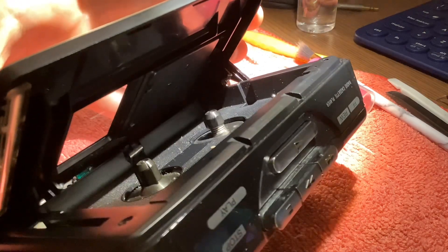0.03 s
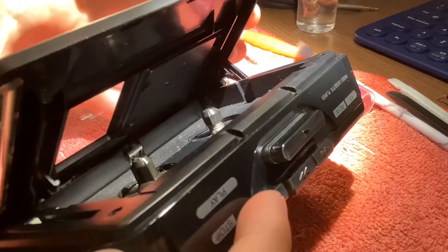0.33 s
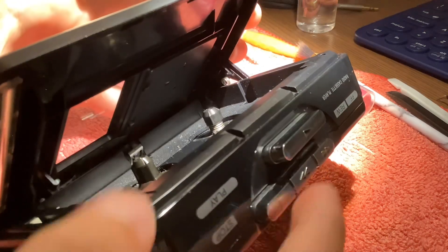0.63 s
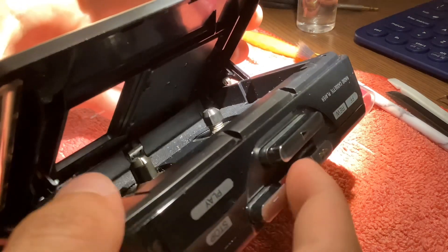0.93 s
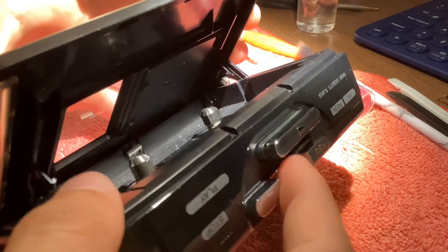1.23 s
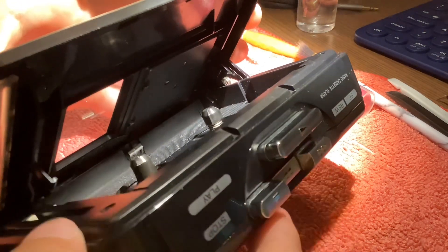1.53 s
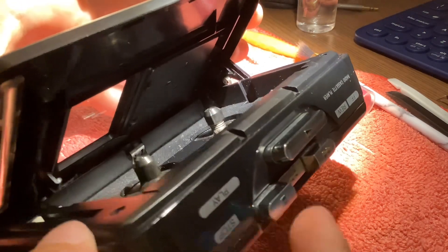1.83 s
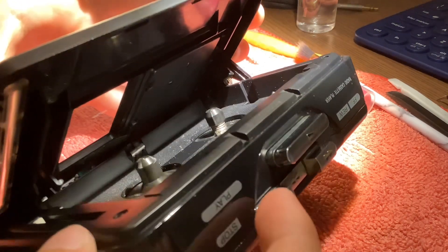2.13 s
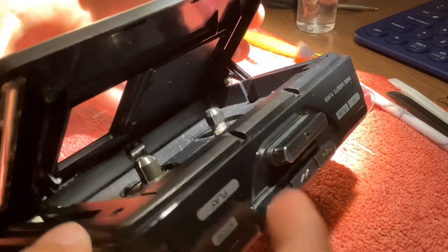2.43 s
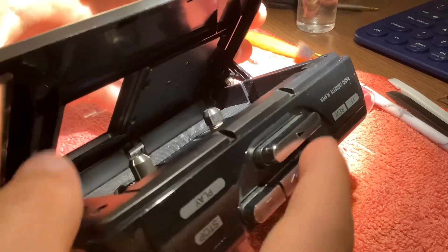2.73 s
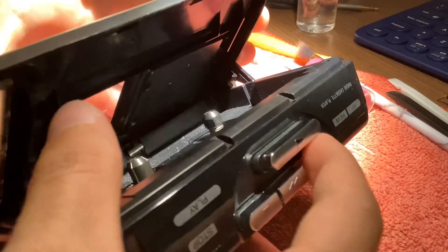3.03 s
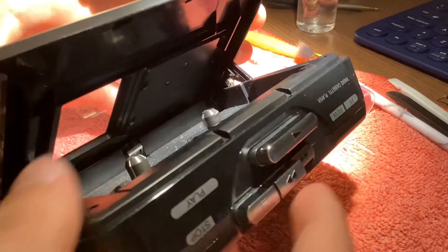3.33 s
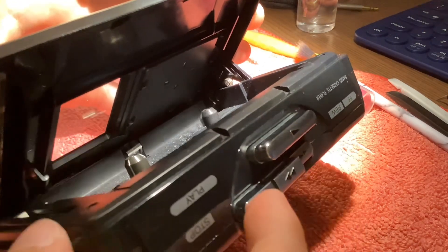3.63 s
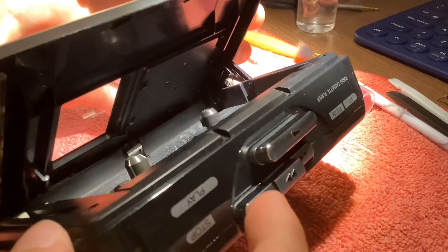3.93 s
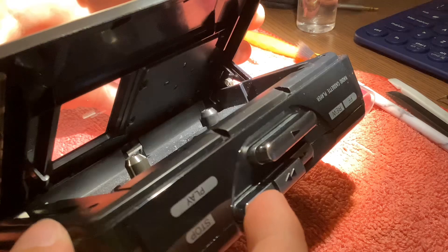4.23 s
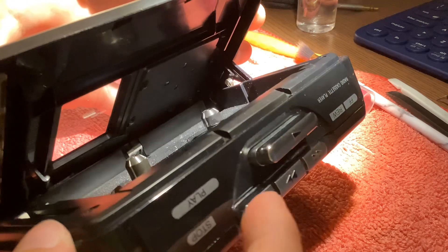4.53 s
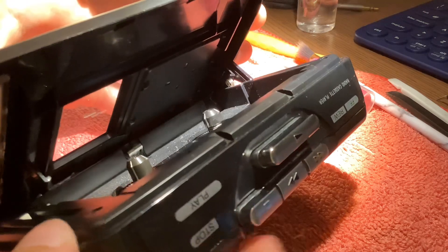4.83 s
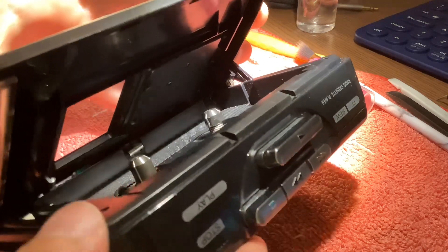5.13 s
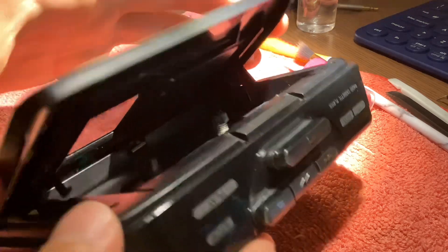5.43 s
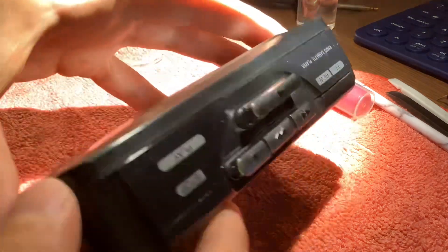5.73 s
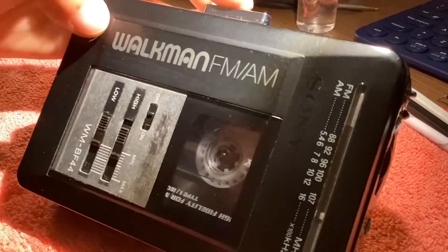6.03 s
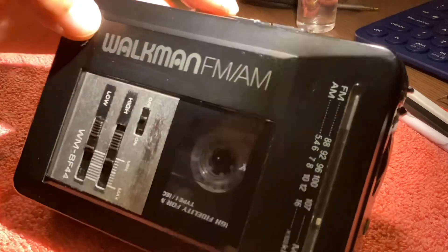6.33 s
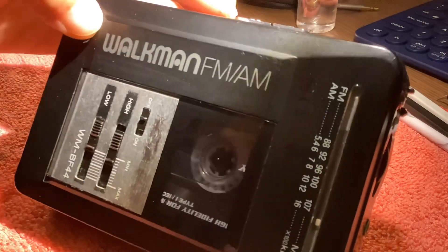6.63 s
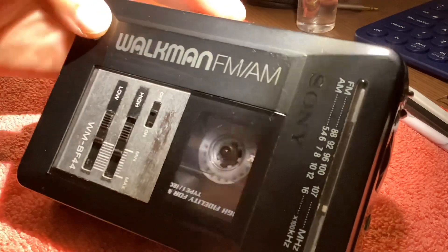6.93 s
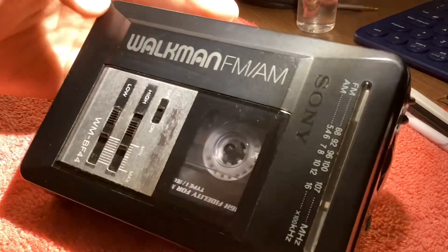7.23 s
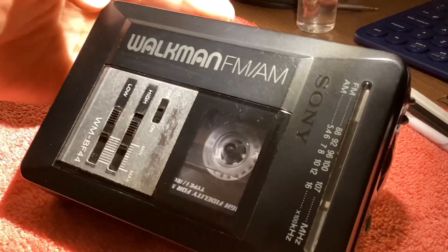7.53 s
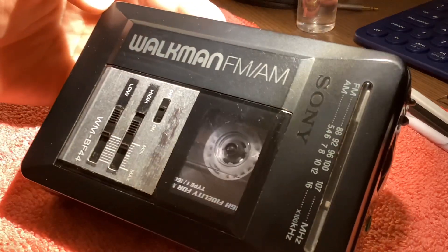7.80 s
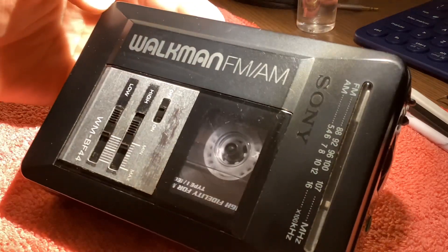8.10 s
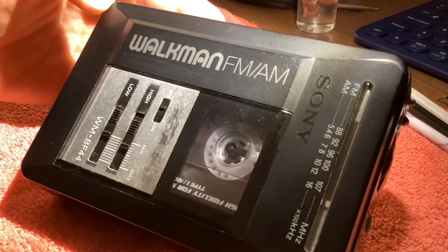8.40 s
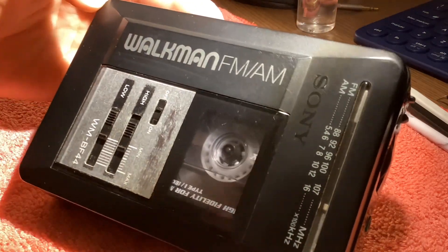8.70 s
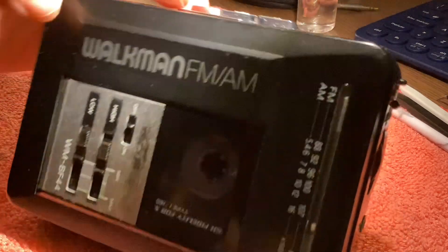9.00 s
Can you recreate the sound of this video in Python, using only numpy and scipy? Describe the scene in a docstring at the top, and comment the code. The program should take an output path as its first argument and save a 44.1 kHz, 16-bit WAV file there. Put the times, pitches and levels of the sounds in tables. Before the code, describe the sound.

Close up in a quiet small room, the keys of a portable cassette player latch and spring back with sharp clicks and soft thuds. Its motor ticks faintly in play, then whirrs in fast wind until another click stops it. Fingers tap and slide on the plastic, the lid is shut, and the case clacks and creaks lightly before a faint motor hum continues through it.

```python
"""Working a portable cassette player

Close up, over a towel on a desk in a small room, keys latch and spring back and the player thuds softly.
Its motor ticks in play and whirrs in fast wind. Fingers tap and slide on the plastic, the lid is shut,
the player is laid down, and play is pressed again, so that the motor hums through the closed case."""
import sys
import numpy as np
from scipy import signal
from scipy.fft import rfft, irfft, next_fast_len
from scipy.io import wavfile
from scipy.ndimage import uniform_filter1d, map_coordinates

SR = 44100
rng = np.random.default_rng(int(sys.argv[2]) if len(sys.argv) > 2 else 0)


def wav_record(signal):
    """Record a signal, one row per channel, as 16-bit PCM in the file named by sys.argv[1]."""
    frames = np.transpose(np.atleast_2d(signal))
    bounded = np.clip(frames, -1, 1)
    # unit amplitude maps onto the largest positive 16-bit level
    quanta = np.round(bounded * 32767).astype(np.int16)
    wavfile.write(sys.argv[1], SR, quanta)


N = 399546
TIME_S = np.arange(N) / SR

# Keys latching or springing back. Knock, edge and snap are parts of a hit, explained in impact().
# start_s, level_db, knock_db, edge_db, snap_db, fade_s
KEY_HITS = [(0.311, 6.5, -2, -0.5, -5.5, 0.0087), (0.315, 1, -7.5, -1, -7, 0.019),
            (1.07, -6, -18, 0, -12, 0.012), (2.273, 3, -19, 0, -6.5, 0.02),
            (2.971, -4, -30, -0.5, 7.5, 0.037), (2.99, -1.5, -22.5, -0.5, 3.5, .012),
            (4.389, -1.5, -19.5, -2.5, 2, 0.017), (4.392, -0.5, -32.5, -3, 3, 0.022)]
# The tone of a key hit, or how strong it is at each pitch: pitch_hz, level_db
KEY_TONE = [(300, -37), (600, -11), (1000, -1.5), (1500, -0.5), (2100, -2.5), (2900, -4), (3700, -3),
            (5400, -1.5), (7500, -17), (10400, -33), (17000, -79)]

def keys():
    """Springs slam the key mechanism against its stops."""
    out = np.zeros(N)
    for start_s, level_db, knock_db, edge_db, snap_db, fade_s in KEY_HITS:
        hit = impact(KEY_TONE, knock_db, edge_db, snap_db, fade_s,
                     rise_s=0.0033, ring_db=7.5, chatter_db=2, panel_db=-8)
        add(out, start_s, amp(level_db) * in_room(hit, echo_db=-14.5))
    return out


# The notes at which the plastic shell and the steel levers ring: pitch_hz, width_hz, level_db
SHELL_NOTES = [(1060, 80, -1), (1180, 37, -3.5), (1500, 210, 2), (2116, 79, 1), (2380, 35, -4.5),
               (3540, 120, -4), (3730, 120, -2), (5490, 140, -5.5), (6050, 100, -7)]
LEVER_NOTES = [(9250, 83, -3.5), (9600, 30, -5.5), (11030, 56, 0), (10500, 93, 0), (11300, 110, -0.5),
               (10400, 110, 0), (12600, 100, -9)]
# The tones of the snapping levers and the knocking inner frame: pitch_hz, level_db
SNAP_TONE = [(4120, -38), (7000, -12), (7800, -13), (8900, -5.5), (10900, -6), (12600, -10.5),
             (15600, -20.5), (16300, -23), (16500, -34)]
KNOCK_TONE = [(40, -29.5), (130, -2.5), (250, 1), (480, 4.5), (750, 4), (1300, -20), (4000, -71)]

def impact(tone, knock_db, edge_db, snap_db, fade_s, rise_s, ring_db, chatter_db, panel_db):
    """Parts collide and the shell rings. Frame knock, hard edge and lever snap are set against that."""
    t = np.arange(4096) / SR
    hz = np.fft.rfftfreq(len(t), 1 / SR)
    swell = amp(np.minimum(25 * (t / rise_s - 1), -60 * (t - rise_s) / fade_s))  # 60 dB down in fade_s
    chatter = amp(chatter_db * unit(uniform_filter1d(noise(len(t)), size=20)))
    force = swell * chatter * noise(len(t))
    # Each spot that is hit favours other notes of the shell and rings three small panels nearby.
    notes = [(pitch, width, db + rng.normal(0, 2.5)) for pitch, width, db in SHELL_NOTES]
    panel_hz, panel_width_hz = 2100, 170
    notes += [(panel_hz * np.exp(0.42 * shift), panel_width_hz, panel_db) for shift in noise(3)]
    shell = amp(along(tone, hz)) * np.hypot(1, amp(ring_db) * abs(resonances(notes, hz)))
    hard = (hz / 2630) ** 5  # only hard contact rings the shell above 2630 Hz
    steel = amp(along(SNAP_TONE, hz)) * np.hypot(1, amp(3) * abs(resonances(LEVER_NOTES, hz)))
    # The heavy frame also feels one firm push.
    push = force / np.linalg.norm(force) + 0.37 * (np.arange(len(t)) == round(rise_s * SR))
    knock = struck(push, amp(along(KNOCK_TONE, hz)))
    ring = struck(force, shell / np.hypot(1, hard))
    edge = struck(force, shell * hard / np.hypot(1, hard))
    snap = struck(force, steel)
    return amp(knock_db) * knock + ring + amp(edge_db) * edge + amp(snap_db) * snap


# The tone of the closed case: pitch_hz, level_db
CLOSED_TONE = [(290, -52), (500, -10.5), (903, 1), (1850, -11), (2420, -8), (3090, -10), (3510, -11.5),
               (3940, -13), (5990, -18.5), (6420, -32.5), (8000, -35), (10400, -49), (17600, -120)]

def clack(knock_db, edge_db):
    """One hit on the closed case sounds duller, because the lid muffles the levers."""
    hit = impact(CLOSED_TONE, knock_db, edge_db, snap_db=edge_db - 23.5,
                 fade_s=0.023, rise_s=0.00295, ring_db=1.5, chatter_db=10.0, panel_db=3)
    return in_room(hit, echo_db=-16)


# Bumps on the closed case: start_s, level_db, knock_db, edge_db
CASE_CLACKS = [(5.839, -26, -14, -5), (5.897, -38, -27.5, 3.5), (6.055, -26, -16, -14.5),
               (6.244, -23, -4, -3), (6.314, -16.5, -14, -11), (6.349, -10.5, -16, 1.5),
               (6.393, -22, -9.5, 6), (6.499, -17.5, -9.5, 3.5), (6.692, -17, -31.5, -6),
               (6.938, -17, -24, -5), (8.903, -28, -7, -12.5)]
# Creaks of the closed case: start_s, length_s, gap_s, level_db
CASE_CREAKS = [(6.18, .11, .02, -26), (6.32, .015, 0.009, -32.5), (6.438, .095, 0.041, -24),
               (6.811, .12, 0.041, -23), (6.972, .06, .042, -31.5)]

def closed_case():
    """The closed case clacks as it is laid down, and creaks in the hand's grip."""
    out = np.zeros(N)
    for start_s, level_db, knock_db, edge_db in CASE_CLACKS:
        add(out, start_s, amp(level_db) * clack(knock_db, edge_db))
    for start_s, level_db in slips(CASE_CREAKS):
        add(out, start_s, amp(level_db) * clack(knock_db=-13, edge_db=-7))
    return out


# The tone of a light tap: pitch_hz, level_db
TAP_TONE = [(350, -45.5), (600, -12.5), (1090, 5), (1870, -5.5), (2180, -8), (3250, -10.5), (3710, -13.5),
            (4650, -9.5), (5070, -19), (5530, -15.5), (8000, -23), (10400, -49), (17600, -120)]

def tap(edge_db, snap_db):
    """One light touch on the open player. The softer the contact, the more it knocks the frame."""
    knock_db = -24.5 - 0.55 * edge_db
    hit = impact(TAP_TONE, knock_db, edge_db, snap_db,
                 fade_s=0.025, rise_s=0.0022, ring_db=6.5, chatter_db=4.5, panel_db=4)
    return in_room(hit, echo_db=-15)


# Fingers tapping the open player: start_s, level_db, edge_db, snap_db
FINGER_TAPS = [(0.294, -18, -0.5, -9.5), (0.667, -33.5, -7, -21), (0.716, -36, 6, -17),
               (0.844, -27, -7, -33.5), (1.015, -31, 9, -6), (1.259, -31, 2, -9.5),
               (1.358, -27.5, -4.5, -26), (1.795, -26, -12, -28), (1.818, -16, -15.5, -38),
               (1.951, -28.5, -4, -25), (2.46, -32.5, -13.5, -1.5), (2.519, -21.5, -2.5, -2.5),
               (2.622, -28.5, -11, -10), (2.902, -32, -7, -15), (2.944, -20.5, -.5, 4.5),
               (2.954, -15.5, -9.5, 0), (3.064, -24, -15, -8), (3.18, -31.5, 4.5, 4.5),
               (4.646, -30, -4, -3), (4.769, -43, -3, 12.5), (4.794, -21.5, -12, -8.5),
               (4.89, -31, -30.5, -5), (5.046, -37, -4, -3), (5.068, -21.5, 5.5, 7),
               (5.138, -27.5, -28, -25), (5.173, -20.5, 1, -9), (5.176, -17.5, -7, -5),
               (5.263, -19, -2.5, -4), (5.321, -25.5, -8, -16), (5.501, -24.5, -3, 1), (5.51, -18, -9, -27),
               (5.719, -23, -8.5, -10), (5.757, -21, -27, -33)]
# Creaks of the open frame: start_s, length_s, gap_s, level_db
FRAME_CREAKS = [(0.562, .06, .045, -39.5), (0.893, .08, .034, -29.5), (4.962, .04, .033, -39),
                (5.528, .07, 0.031, -24)]

def finger_taps():
    """The loose keys and the lid tick under the fingers, and the open frame creaks softly."""
    out = np.zeros(N)
    for start_s, level_db, edge_db, snap_db in FINGER_TAPS:
        add(out, start_s, amp(level_db) * tap(edge_db, snap_db))
    for start_s, level_db in slips(FRAME_CREAKS):
        add(out, start_s, amp(level_db) * tap(edge_db=-9, snap_db=-36))
    return out


def slips(creaks):
    """Strained plastic sticks and slips unevenly. Gives start_s and level_db for each slip."""
    for start_s, length_s, gap_s, level_db in creaks:
        count = int(length_s / gap_s) + 1
        late, loud = noise((count, 2)).T
        gaps = gap_s * np.exp(0.13 * late)
        yield from zip(start_s + np.cumsum(gaps) - gaps, level_db + 2.5 * loud)


# The whole player bouncing: start_s, swing_db, desk_db
BOUNCES = [(0.3154, -21, -31.5), (1.076, -45, -35), (2.274, -59.5, -48.5), (2.992, -49, -45),
           (3.27, -56, -60), (4.4, -55, -36.5), (4.86, -58.5, -66), (5.14, -65, -63), (5.3, -62, -63.5),
           (6.318, -61, -46), (6.507, -52, -42), (8.906, -61, -47)]
# The tone of the desk's rumble: pitch_hz, level_db
DESK_TONE = [(25, -31.5), (60, -8), (120, 5.5), (200, -14.5), (350, -22.5), (800, -73)]

def thuds():
    """The player's weight swings a few times on the towel, and the desk rumbles after it."""
    out = np.zeros(N)
    t = np.arange(SR // 2) / SR
    swing_hz, swing_fade_s, desk_fade_s = 77, 0.085, 0.1
    for start_s, swing_db, desk_db in BOUNCES:
        swing = np.cos(2 * np.pi * swing_hz * t) * amp(-60 * t / swing_fade_s) * (1 - np.exp(-t / 0.001))
        desk = with_tone(noise(len(t)), DESK_TONE) * amp(-60 * t / desk_fade_s) * (1 - np.exp(-t / 0.034))
        add(out, start_s, amp(swing_db) * swing + amp(desk_db) * desk)
    return out


# When fast wind runs: on_s, off_s
WIND_TIMES = [(2.98, 4.39)]
# Motor speed, given as the pulsing of its pull (three pulses a turn): time_s, pulse_hz
WIND_SPEED = [(3, 92.8), (3.4, 96.4), (4.4, 97.1)]
# The tone of the belt and gears in fast wind: pitch_hz, level_db
WIND_TONE = [(150, -48), (250, -19.5), (373, -18), (474, -5.5), (544, -22.5), (772, -5.5), (1010, -6.5),
             (1100, 5.5), (1260, -12), (1390, -0.5), (1830, -14.5), (2240, -10.5), (2880, -27),
             (3700, -19.5), (5000, -40.5), (6500, -74), (11000, -120)]
# Metal rung by the brushes, the motor's sliding contacts: pitch_hz, width_hz, level_db
WIND_NOTES = [(5900, 310, -17), (6940, 410, -12), (9900, 1400, -5.5), (10960, 530, 0.5), (11700, 460, -5),
              (13300, 860, -14.5), (14690, 711, -17.5)]

def fast_wind():
    """The motor and gears whirr as they wind the tape."""
    whirr = mechanism(WIND_SPEED, WIND_TONE, WIND_NOTES, brush_db=2.5, tick_db=-11.5, sharpness=2.9)
    return amp(-57.5) * whirr * switched(WIND_TIMES)


# When the tape plays with the lid open: on_s, off_s
OPEN_TIMES = [(-1, 0.31), (1.07, 2.27)]
# Motor speed with the lid open: time_s, pulse_hz
OPEN_SPEED = [(0, 114.2), (2.3, 115.7)]
# The tone of the uncovered belt and gears: pitch_hz, level_db
OPEN_GEAR_TONE = [(120, -35.5), (200, -22.5), (400, -22), (465, -13.5), (550, -16.5), (900, -11),
                  (1040, -0.5), (1150, -0.5), (1270, -16), (1400, -4), (1820, -14), (2140, -3.5),
                  (2600, -27), (5000, -28), (16000, -28)]
# Metal rung by the brushes: pitch_hz, width_hz, level_db
OPEN_NOTES = [(5650, 300, -6.5), (7240, 300, -15), (8650, 180, -0.5), (11250, 210, 3.5), (12700, 580, -1),
              (15400, 320, 0)]

def play_open():
    """With the lid open, the motor ticks sharply over a thin hum."""
    sound = mechanism(OPEN_SPEED, OPEN_GEAR_TONE, OPEN_NOTES, brush_db=1.5, tick_db=-2.5, sharpness=6)
    sound += amp(-3) * hum(OPEN_SPEED, overtones=[(4, -18.5), (9, 1.5)], flutter=0.0013)
    return amp(-69.5) * sound * switched(OPEN_TIMES)


# When the tape plays with the lid shut: on_s, off_s
SHUT_TIMES = [(6.49, 10)]
# Motor speed with the lid shut: time_s, pulse_hz
SHUT_SPEED = [(6.5, 111.8), (6.9, 112.5), (9.06, 113.2)]
# The tone of the belt and gears through the case: pitch_hz, level_db
SHUT_GEAR_TONE = [(180, -43), (300, -25), (528, -23), (668, -8), (734, -13.5), (788, -3), (845, -11.5),
                  (1010, -5.5), (1250, -23), (1580, -17), (1770, -23.5), (2020, -18.5), (3160, -18),
                  (4000, -27.5), (5000, -37), (6500, -49), (11000, -120)]
# Metal rung by the brushes: pitch_hz, width_hz, level_db
SHUT_NOTES = [(4400, 140, -13.5), (5544, 300, -2.5), (5680, 400, -4), (5990, 71, -2.5), (7100, 77, -19),
              (8770, 180, -18)]
# The pure tones in the hum: multiple_of_pulse_rate, level_db
SHUT_OVERTONES = [(1, -39), (6, -9.5), (7, -5.5), (8, -6), (9, 2), (10, -26), (18, -18.5), (21, -21)]

def play_shut():
    """Through the closed case, the ticks are softer and the hum stands out."""
    sound = mechanism(SHUT_SPEED, SHUT_GEAR_TONE, SHUT_NOTES, brush_db=-5.0, tick_db=-2, sharpness=1.8)
    sound += amp(4.5) * hum(SHUT_SPEED, SHUT_OVERTONES, flutter=0.0019)
    return amp(-71.5) * sound * switched(SHUT_TIMES)


# The player tipping towards the microphone at the end, which makes the motor louder: time_s, gain_db
TIPPING = [(8.4, -0.5), (8.85, 0.8), (9.06, 4)]

def motor():
    """The motor ticks in open play, whirrs in fast wind and hums through the shut case."""
    return (play_open() + fast_wind() + play_shut()) * amp(curve(TIPPING))


def mechanism(speed, gear_tone, metal_notes, brush_db, tick_db, sharpness):
    """The brushes tick six times a turn and ring the metal, while the belt and gears rustle."""
    tick_count = 2 * np.cumsum(curve(speed) * (1 + 0.0068 * wobble(12.0))) / SR
    strengths_db = np.array([1.5, -1, 0.5, 1, -1.5, -0.5])
    contact = 0.28 + np.exp(-sharpness * (tick_count % 1))  # the brushes keep rubbing between ticks
    ticks = unit(contact * amp(strengths_db[tick_count.astype(int) % 6]))
    brushes = unit(filtered(ticks * noise(), lambda hz: resonances(metal_notes, hz)))
    gears = with_tone((1 + amp(tick_db) * ticks) * noise(), gear_tone)
    return gears * amp(1.6 * wobble(20)) + amp(brush_db) * brushes * amp(0.61 * wobble(5.4))


def hum(speed, overtones, flutter):
    """The motor's pulsing pull makes pure tones, whose pitch flutters with the belt."""
    phase = 2 * np.pi * np.cumsum(curve(speed) * (1 + flutter * wobble(15))) / SR
    return unit(sum(amp(db + 0.61 * wobble(4.3)) * np.sin(multiple * phase) for multiple, db in overtones))


# A fingertip sliding, the thumb bracing the open frame, and the hand shifting the closed case:
# middle_s, length_s, level_db
FINGER_SLIDES = [(2.73, 0.58, -58), (3.0, 0.23, -58.5), (3.31, 0.43, -53.5), (4.88, 0.1, -54.5),
                 (5.1, 0.94, -85), (5.56, 0.34, -57), (5.77, 0.099, -70.5), (6.28, 0.43, -80)]
THUMB_RUBS = [(0.65, 0.29, -69.5), (1.0, 0.56, -71.5), (1.34, 0.15, -64)]
GRIP_SHIFTS = [(6.39, 0.6, -65), (6.81, 0.37, -66), (9.0, 0.47, -82)]
# The tones of rubbing on the shell, the frame and the towel: pitch_hz, level_db
SKIN_TONE = [(530, -28.5), (900, -7), (1040, -11), (1150, -0.5), (1230, -39), (1340, -13), (1620, -9.5),
             (2860, -8), (4310, -9.5), (4860, -8.5), (8450, -4), (10400, 6), (16000, -25)]
FRAME_TONE = [(300, -24), (1050, 0.5), (1800, 1.5), (3000, 0), (5200, 1), (6000, 3.5), (6600, -7),
              (12000, -11), (16000, -15)]
TOWEL_TONE = [(50, -17), (110, -3), (210, -6.5), (400, -9), (800, -4), (1500, -33), (5000, -76)]

def rubbing():
    """Skin hisses over the textured shell. The grip makes the case creak and drag on the towel."""
    skin = with_tone(noise(), SKIN_TONE) * amp(1.2 * wobble(60))
    thumb = with_tone(noise(), FRAME_TONE) * amp(0.93 * wobble(71.15))
    creak = with_tone(noise() * amp(3.6 * wobble(280)), CLOSED_TONE)
    drag = amp(-1.5) * with_tone(noise(), TOWEL_TONE) * amp(2.4 * wobble(22))
    return (skin * strokes(FINGER_SLIDES, sharpness=2.03)
            + thumb * strokes(THUMB_RUBS, sharpness=0.73)
            + (creak + drag) * strokes(GRIP_SHIFTS, sharpness=1.0))


def strokes(rows, sharpness):
    """Each rub swells and fades in one arch, as the hand speeds up and slows down."""
    return sum(amp(db) * np.maximum(1 - (2 * (TIME_S - middle_s) / length_s) ** 2, 0) ** sharpness
               for middle_s, length_s, db in rows)


# When the soft hiss sounds: on_s, off_s
HISS_TIMES = [(8.65, 10)]
# The tone of the quiet room: pitch_hz, level_db
AIR_TONE = [(20, -29), (45, -13.5), (70, -3), (120, -3), (300, -8), (1000, -5), (3000, -16.5), (8000, -18),
            (16000, -23)]

def background():
    """Faint room noise runs throughout, and a soft hiss sets in near the end."""
    hiss = amp(-65) * with_tone(noise(), SKIN_TONE) * switched(HISS_TIMES, rise_s=0.02)
    return amp(-81) * with_tone(noise(), AIR_TONE) + hiss


# How long the room's echo takes to fall by 60 dB: pitch_hz, fade_s
ROOM_FADES = [(100, 0.06), (500, 0.083), (1100, 0.35), (3000, 0.22), (5500, 0.24), (10000, 0.23),
              (16000, 0.26)]

def in_room(sound, echo_db):
    """A short sound arrives directly, then the walls answer with a fading echo."""
    wall_delay_s = 0.008
    hz, t, spectrum = signal.stft(noise(SR // 2), SR, nperseg=256)
    fade = amp(-60 * t / along(ROOM_FADES, hz)[:, None])
    tail = signal.istft(spectrum * fade, SR, nperseg=256)[1]
    path = np.pad(amp(echo_db) * tail / np.linalg.norm(tail), (1 + round(wall_delay_s * SR), 0))
    path[0] = 1  # the direct sound
    return signal.fftconvolve(sound, path)


def struck(force, body_gain):
    """A force rings a body. The force's own tone is evened out, and the result has energy 1."""
    drive = rfft(force)
    force_tone = np.sqrt(abs(uniform_filter1d(abs(drive) ** 2, size=30)) + 1e-20)
    log_response = irfft(np.log(np.maximum(body_gain, 1e-4) / force_tone))
    log_response[len(log_response) // 2:] = 0  # the body rings after the hit, never before
    sound = irfft(drive * np.exp(rfft(2 * log_response)))
    return sound / np.linalg.norm(sound)


def resonances(notes, hz):
    """How an object with these ringing notes answers at each pitch. Narrow notes ring longer."""
    return sum((-1) ** k * amp(db) * 1j * hz * width / (pitch ** 2 - hz ** 2 + 1j * hz * width)
               for k, (pitch, width, db) in enumerate(notes))


def switched(rows, rise_s=0.19, fall_s=0.01):
    """A volume that rises after each switching on and dies away after each switching off."""
    return sum((1 - np.exp(-np.maximum(TIME_S - on_s, 0) / rise_s))
               * np.exp(-np.maximum(TIME_S - off_s, 0) / fall_s) for on_s, off_s in rows)


def with_tone(sound, tone):
    """Shape a sound with a tone table and bring its average strength to 1."""
    return unit(filtered(sound, lambda hz: amp(along(tone, hz))))


def filtered(sound, response):
    """Turn each pitch in a sound up or down by response(hz)."""
    size = next_fast_len(len(sound) + 8192)
    return irfft(rfft(sound, size) * response(np.fft.rfftfreq(size, 1 / SR)), size)[:len(sound)]


def noise(shape=N):
    """Random numbers, which sound like an even hiss."""
    return rng.standard_normal(shape)


def wobble(rate_hz):
    """A smooth curve through rate_hz random values a second."""
    return map_coordinates(noise(int(N * rate_hz / SR) + 4), [TIME_S * rate_hz])


def along(rows, hz):
    """Read between the rows of a (pitch_hz, value) table, with octaves evenly spaced."""
    pitches, values = np.transpose(rows)
    return np.interp(np.log(hz + 1), np.log(pitches + 1), values)


def curve(rows):
    """Join (time_s, value) rows into one value per sample."""
    return np.interp(TIME_S, *np.transpose(rows))


def amp(db):
    """Turn decibels into a volume factor."""
    return 10 ** (np.asarray(db) / 20)


def unit(sound):
    """Scale a sound to an average strength (rms) of 1."""
    return sound / np.sqrt(np.mean(sound ** 2) + 1e-20)


def add(track, start_s, sound):
    """Mix a sound into the track from start_s on."""
    part = track[max(round(start_s * SR), 0):][:len(sound)]
    part += sound[:len(part)]


def scene():
    """All the sounds meet at one close microphone."""
    return (keys() + thuds() + motor() + rubbing() + background() + finger_taps() + closed_case())[None]


def record(dry):
    """The small microphone loses the deep bass, and the very highest treble is cut off."""
    low_cut_hz, top_hz = 48, 16150
    thin = signal.sosfilt(signal.butter(2, low_cut_hz, "highpass", fs=SR, output="sos"), dry)
    return np.array([filtered(x, lambda hz: 1 / np.sqrt(1 + (hz / top_hz) ** 160)) for x in thin])


dry = scene()
out = record(dry)
wav_record(out)
```